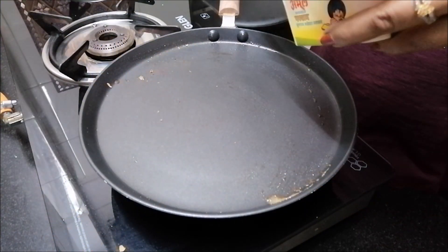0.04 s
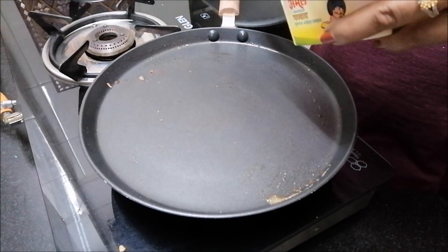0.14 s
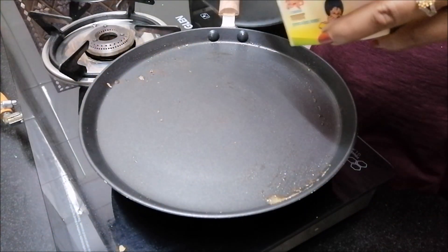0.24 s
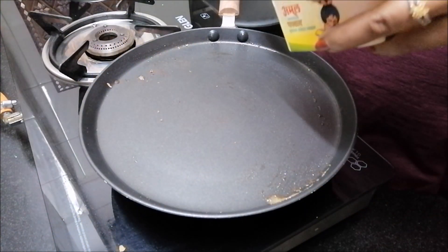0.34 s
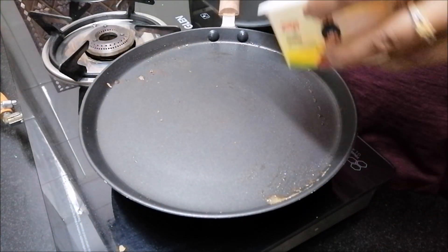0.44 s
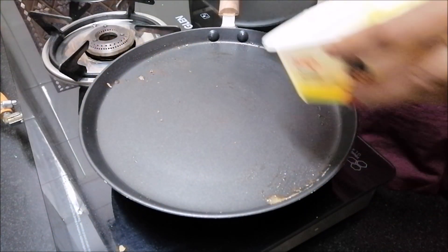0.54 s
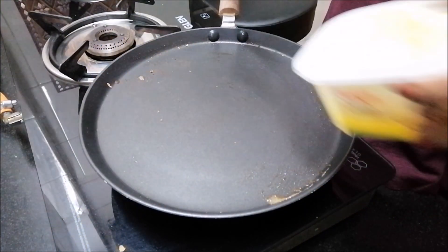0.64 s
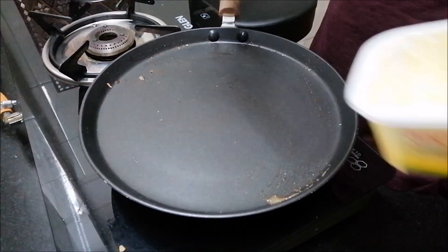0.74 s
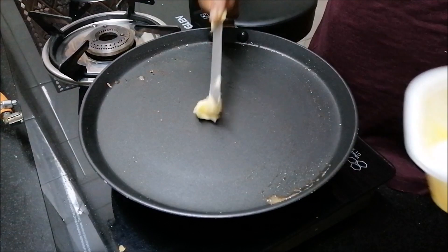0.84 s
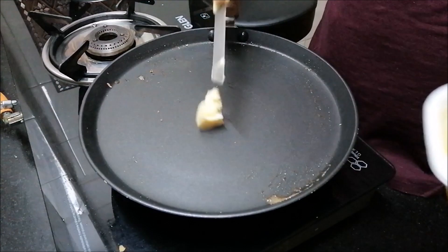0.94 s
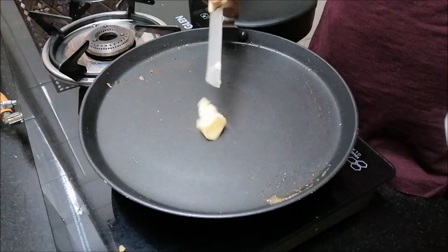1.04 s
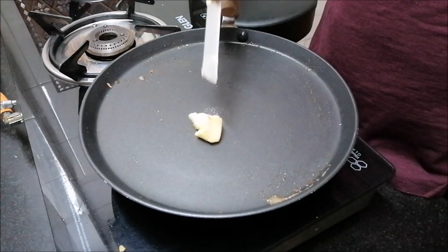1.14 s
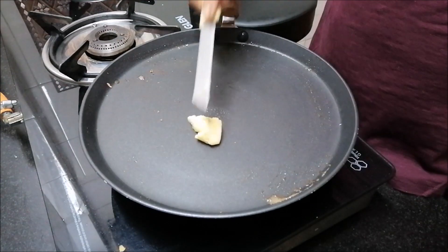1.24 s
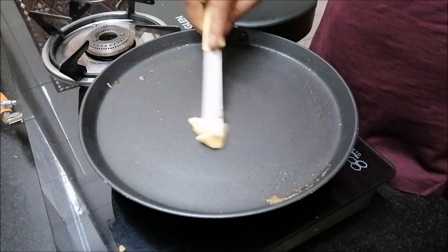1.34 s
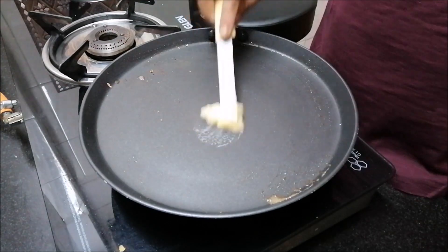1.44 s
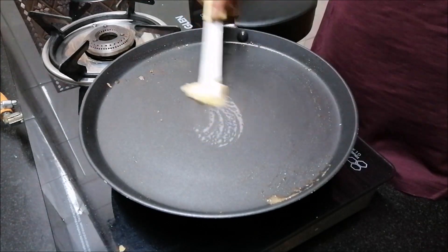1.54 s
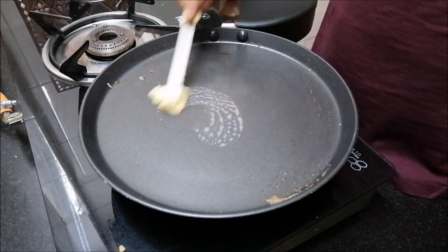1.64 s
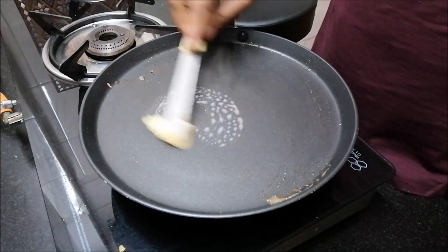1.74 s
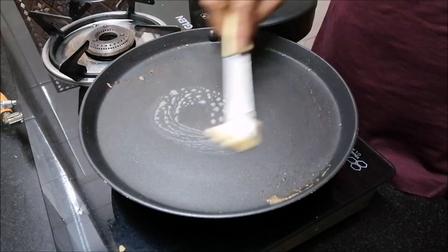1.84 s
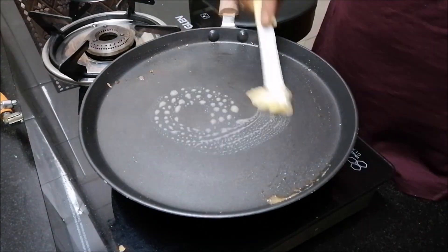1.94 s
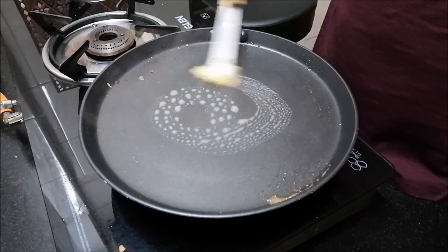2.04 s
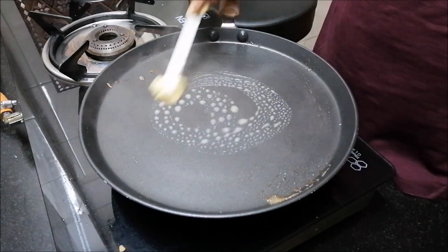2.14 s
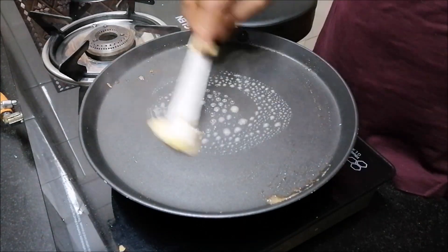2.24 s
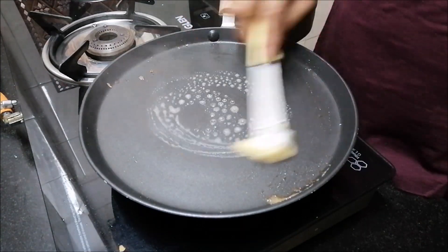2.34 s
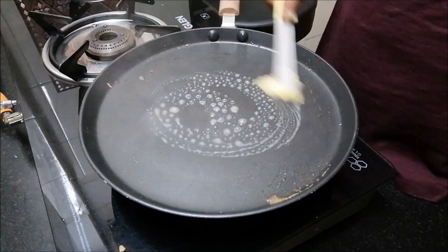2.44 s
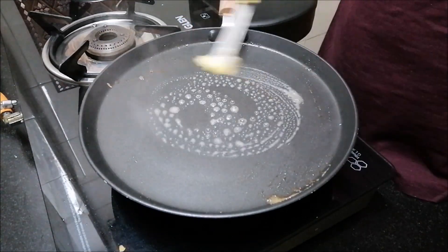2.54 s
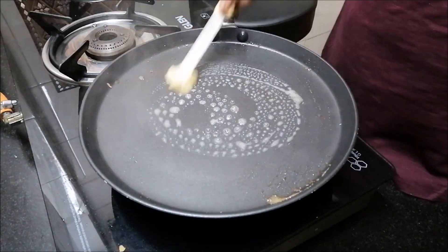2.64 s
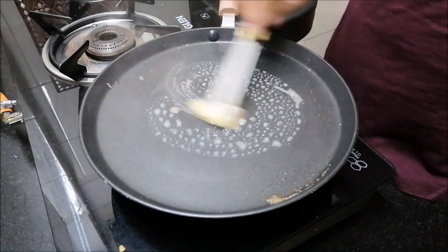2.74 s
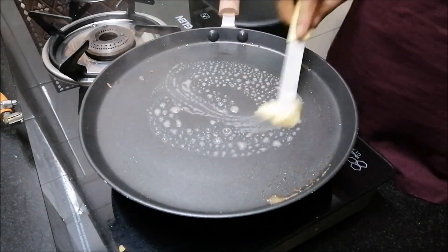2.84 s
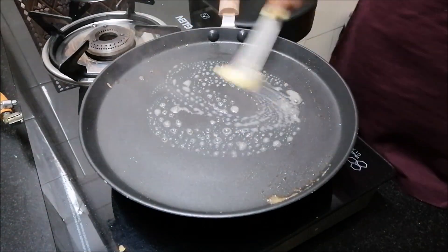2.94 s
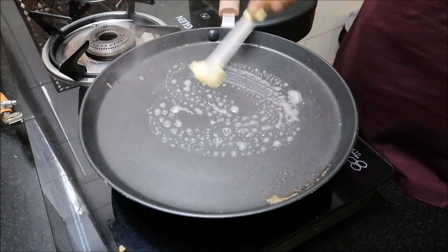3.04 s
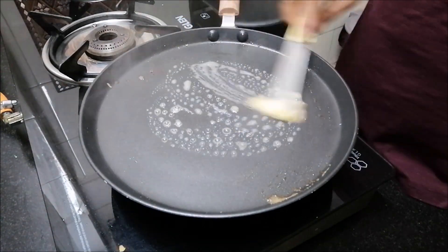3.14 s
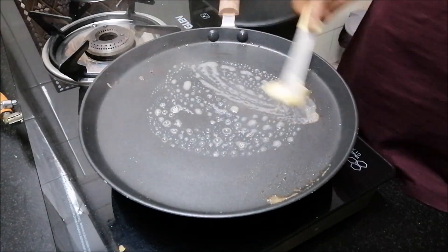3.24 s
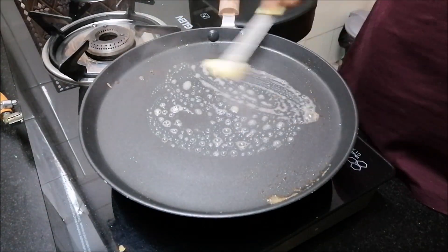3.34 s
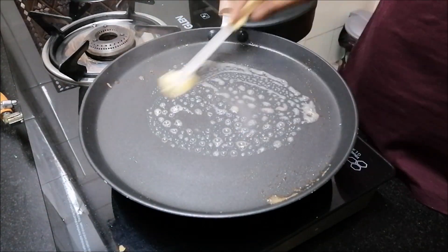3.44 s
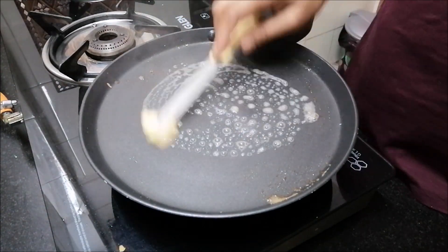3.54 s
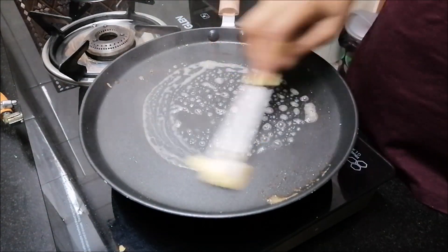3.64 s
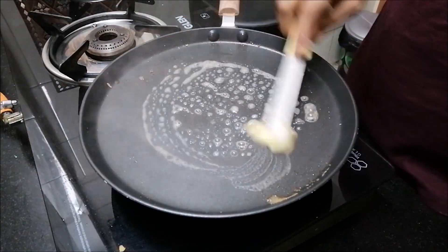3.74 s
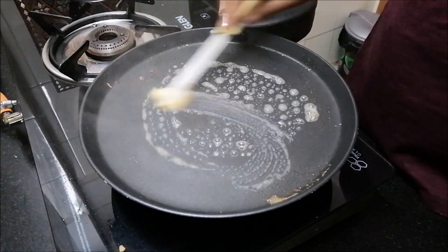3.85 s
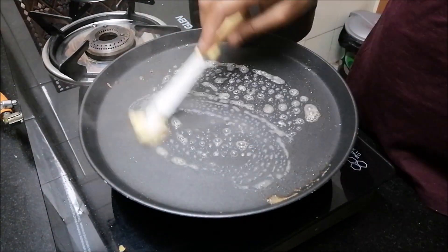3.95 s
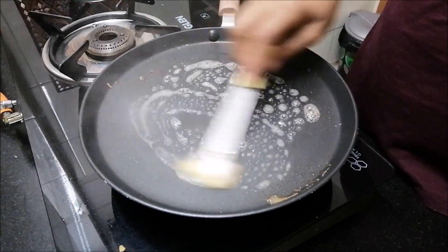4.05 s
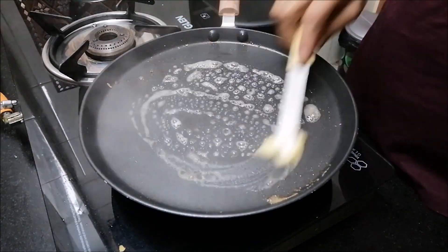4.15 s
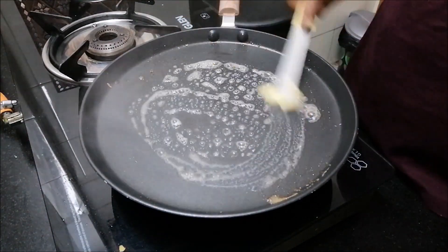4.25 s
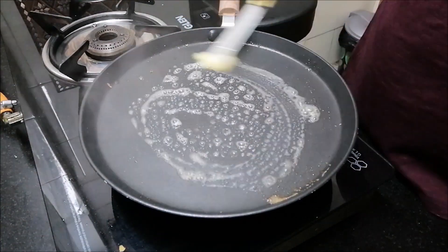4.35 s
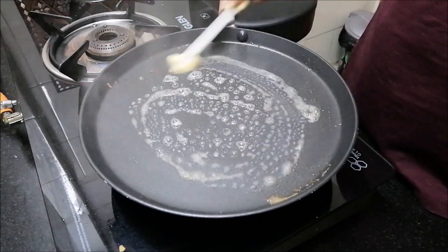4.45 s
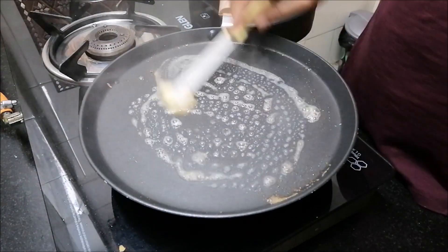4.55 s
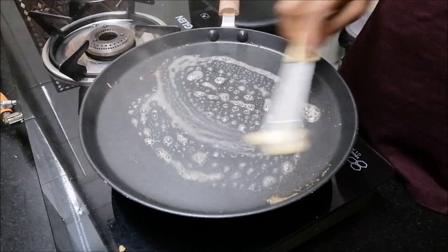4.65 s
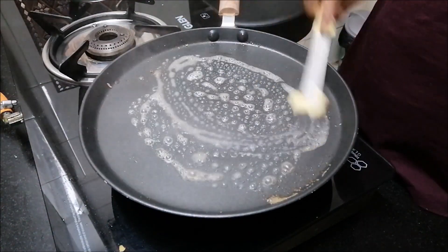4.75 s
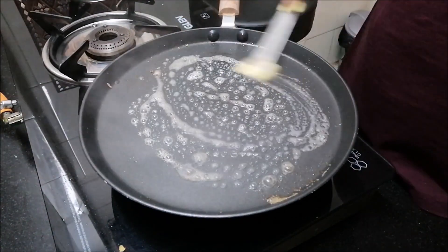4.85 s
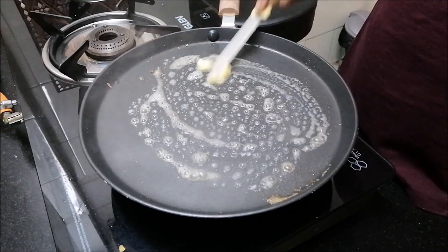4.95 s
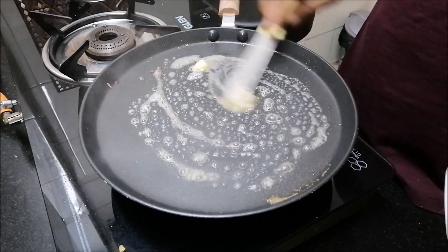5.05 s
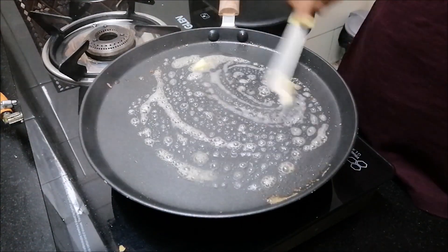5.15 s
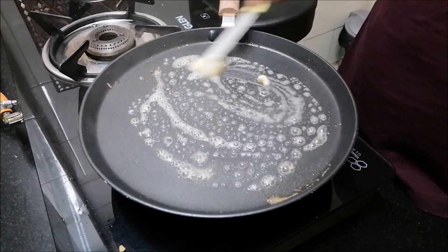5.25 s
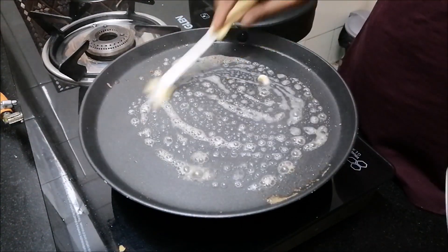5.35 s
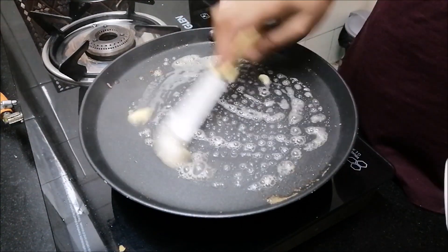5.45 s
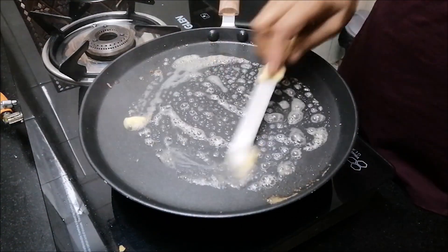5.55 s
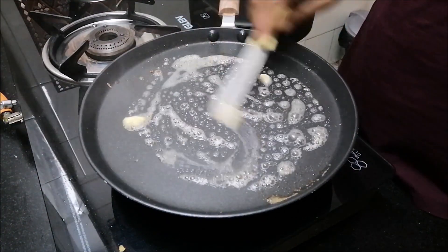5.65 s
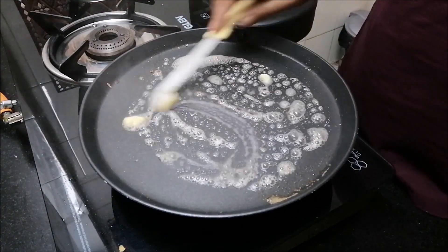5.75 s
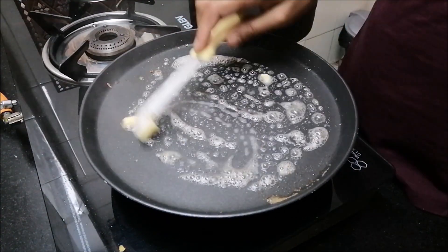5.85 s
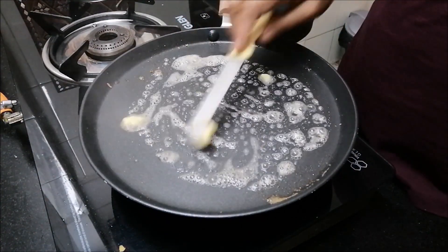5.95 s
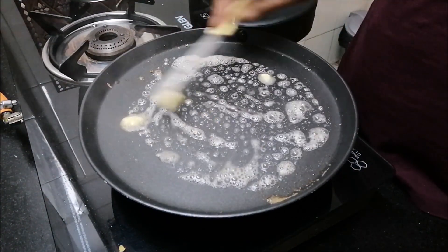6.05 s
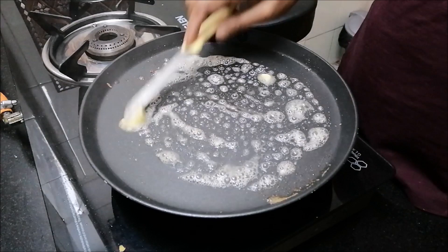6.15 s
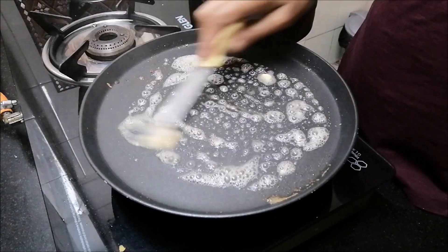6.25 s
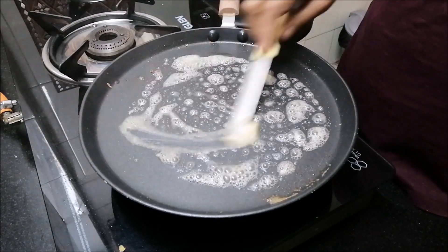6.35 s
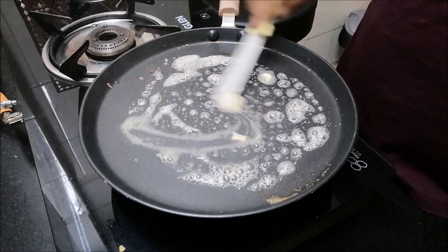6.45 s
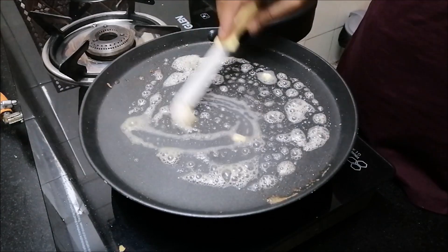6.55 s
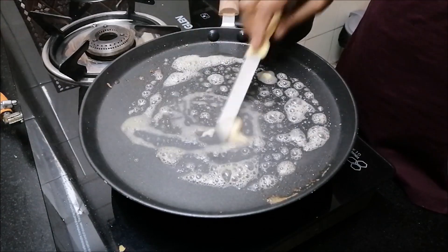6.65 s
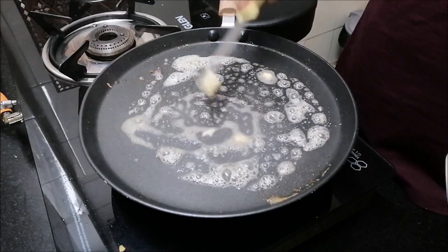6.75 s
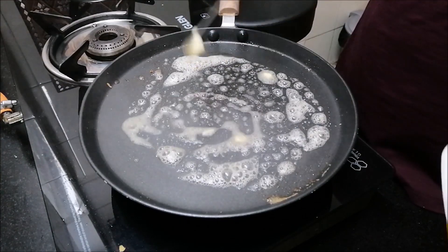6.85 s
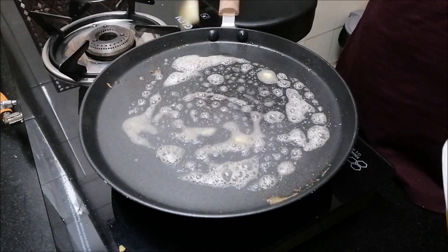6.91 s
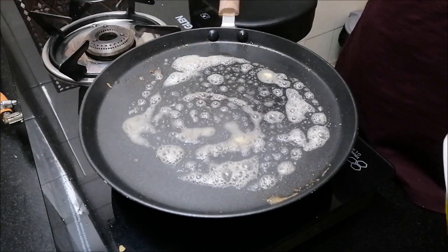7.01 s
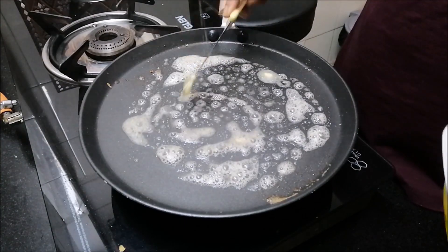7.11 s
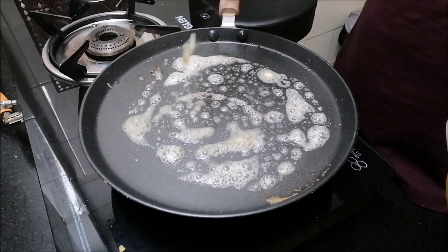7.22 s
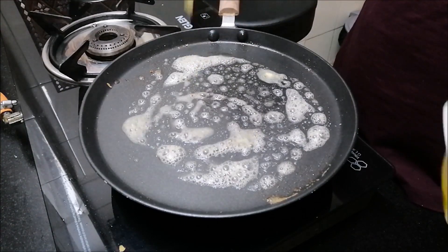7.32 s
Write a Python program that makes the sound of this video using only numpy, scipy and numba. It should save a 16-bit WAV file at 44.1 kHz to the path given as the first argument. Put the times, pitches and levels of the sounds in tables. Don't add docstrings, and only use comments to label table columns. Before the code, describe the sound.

Close phone microphone over a stove: quiet room air and motor hum with small taps for about a second, then an abrupt crackling hiss as butter meets hot metal. It thins while resting, grows as it is swept about, flaring gently with each stroke. Random snapping pops continue, one short metallic squeak comes late, and the foam grows coarser and bubblier.

```python
import sys
import numpy as np
from scipy import signal
from scipy.fft import rfft, irfft
from scipy.io import wavfile
from scipy.ndimage import uniform_filter1d
from numba import njit

SR = 44100
rng = np.random.default_rng(int(sys.argv[2]) if len(sys.argv) > 2 else 0)


def voltage_ratio(decibels):
    exponent = np.asarray(decibels, float) / 20
    return 10 ** exponent


def log_audio(samples):
    frames = np.atleast_2d(samples).T
    limited = np.clip(frames, -1, 1)
    pcm = np.round(limited * 32767).astype(np.int16)
    wavfile.write(sys.argv[1], SR, pcm)


N = 325458

LEFT_LATE_SAMPLES = 3
ALIVE = 0.65


def at(table, x, log=False):
    first, *columns = np.transpose(table)
    warp = np.log if log else np.asarray
    return np.array([np.interp(warp(x), warp(first), c) for c in columns])


def unit(x):
    return x / np.sqrt(np.mean(np.atleast_2d(x).mean(axis=0) ** 2))


def walk(rate_hz):
    hold = int(SR / rate_hz)
    x = np.repeat(rng.standard_normal(N // hold + 1), hold)
    x = uniform_filter1d(uniform_filter1d(x, hold), hold)[:N]
    return x / x.std()


def swell(t, start_s, length_s):
    return np.sin(np.pi * np.clip((t - start_s) / length_s, 0, 1)) ** 2


def ring(x, hz, t60_s):
    pole = np.exp(2j * np.pi * hz / SR - np.log(1000) / (t60_s * SR))
    return signal.lfilter([1], [1, -pole], x).imag


def causal(db):
    c = irfft(db * np.log(10) / 20)
    half = c.shape[-1] // 2
    c[..., 1:half] *= 2
    c[..., half + 1:] = 0
    return irfft(np.exp(rfft(c)))[..., :half]


def kitchen():
    # f/Hz, left level/dB, right level/dB
    air_levels = [(25, -6, -6), (70, -15.5, -4), (155, -1, 1), (400, -11, -16.5), (600, -8.5, -10.5),
                  (750, -13.5, -11.5), (1400, -28, -19.5), (2030, -26.5, -26), (3870, -29.5, -32.5),
                  (6500, -13, -23.5), (8400, -25.5, -20), (12300, -32.5, -33), (14800, -18, -30),
                  (15700, -43, -42.5)]
    # f/Hz, likeness/0-1
    likeness = [(25, 0.7), (130, 0.99), (290, 0.53), (640, 0.04), (1400, 0.03), (3000, 0)]
    # f/Hz, width/Hz, level/dB
    hum_tones = [(118.4, 19, -65.5), (190, 15, -70.5), (226, 26, -71.5), (373.8, 12, -68), (435.3, 28, -72),
                 (495, 8.2, -76.5), (650, 7.3, -76.5), (850.4, 7.7, -78), (1072, 31, -75), (2300, 110, -75),
                 (2890, 560, -74.5), (8150, 70, -87.5), (9400, 60, -87)]
    hz = np.maximum(np.arange(N // 2 + 1) * SR / N, 1)
    alike = np.clip(at(likeness, hz, log=True)[0], 0, 1)
    mid, side = rfft(rng.standard_normal((2, N)))
    pair = np.sqrt(1 + alike) * mid + np.sqrt(1 - alike) * side * np.array([[1], [-1]])
    air = unit(irfft(pair * voltage_ratio(at(air_levels, hz, log=True)), N)) * voltage_ratio(-58.5 + 0.26 * walk(11))

    fan_hz = 119.5 + 1.43 * walk(3.4)
    fan = voltage_ratio(-55.5 + 0.32 * walk(5.75)) * np.sin(2 * np.pi * np.cumsum(fan_hz) / SR)
    whine_hz = 2283 + 5.9 * walk(30)
    tones = voltage_ratio(-73.5 + 1.1 * walk(36)) * np.sin(2 * np.pi * np.cumsum(whine_hz) / SR)
    for f, width_hz, db in hum_tones:
        push = rng.standard_normal(N) + f / 900 * rng.standard_normal((2, N))
        tones = tones + voltage_ratio(db) * unit(ring(push, f, np.log(1000) / (np.pi * width_hz)))
    return air + (fan + tones) * voltage_ratio(np.array([[1.5], [-1.5]]))


def knocks(t):
    # t/s, peak level/dB, f/Hz, t60/s, left minus right/dB
    taps = [(0.044, -49.5, 6500, 0.011, 18), (0.048, -46, 14200, .008, 7), (0.083, -45.5, 214, 0.086, 11.5),
            (0.084, -58, 1530, 0.11, 12), (.095, -50, 537, 0.12, 8), (.143, -49, 322, 0.13, 11),
            (.211, -55, 500, 0.037, 7), (.378, -61, 1520, 0.033, 15.5), (.496, -51, 13000, .012, 5),
            (.504, -50, 10000, .012, 5), (.514, -54, 13500, .01, 5), (.13, -56, 1900, 0.099, 8),
            (.6, -50, 228, 0.08, 11), (3.562, -58, 720, 0.06, 12), (3.563, -65, 400, 0.06, 5),
            (5.755, -57, 750, 0.055, 0)]
    out = np.zeros((2, N))
    u = t[:8192]
    for s, peak_db, hz, t60_s, pan_db in taps:
        i = int(s * SR)
        rattle = rng.standard_normal(len(u)) * voltage_ratio(-60 * u / t60_s) * np.minimum(u / 0.0026, 1)
        ring_cycles = 12 if hz < 5000 else 5
        tap = ring(rattle, hz, min(t60_s, ring_cycles / hz))
        level = voltage_ratio(peak_db + np.array([[pan_db], [-pan_db]]) / 2)
        out[:, i:i + len(u)] += level * tap / np.abs(tap).max()
    return out


@njit
def grains(start, hz, cycles, glide, size, lag, pan):
    out = np.zeros((2, N + 4096))
    for k in range(len(start)):
        p = np.exp((2j * np.pi - 1 / cycles[k]) * hz[k] / SR)
        turn = np.exp(2j * np.pi * glide[k] * (hz[k] / SR) ** 2 / cycles[k])
        z, i, j = size[k] + 0j, int(start[k]), int(start[k] + lag[k])
        for n in range(min(int(5 * cycles[k] * SR / hz[k]), 2000)):
            out[0, i + n] += z.imag * pan[k]
            out[1, j + n] += z.imag / pan[k]
            z *= p
            p *= turn
    return out[:, :N]


def ports(x):
    # f/Hz, left level/dB, right level/dB
    port_peaks = [(2000, -24, -24), (3050, -19, -22), (4100, -27, -26), (5100, -9, -13), (6400, -10, -13),
                  (7200, 0, -8), (7900, -6, -8), (8400, -8, 2), (9300, -12, -6), (10000, -9, -5),
                  (10700, -13, -11), (14000, -8, -12), (14850, -1, -7), (15450, -10, -16)]
    hz = np.maximum(np.arange(513) * SR / 1024, 1)
    low_hz = port_peaks[0][0]
    low_cut_db = np.clip((hz - low_hz) / 30, -7, 0) + 22 * np.log10(np.minimum(hz / low_hz, 1))
    response = causal(at(port_peaks, hz, log=True) + low_cut_db)
    return signal.fftconvolve(x, response, axes=1)[:, :N]


def foam(alive):
    count, lag_samples = 60000, 25
    when, keep, pitch, ringing, big, place, side, rise = rng.random((count, 8)).T
    start = 64 + when * (N - 64)
    share = np.clip(alive[start.astype(int)], .02, 1)
    hz = 900 + 16500 * pitch
    turns = 1.25 + 6.45 * ringing ** 2
    size = voltage_ratio(-2.45 * np.log(1 - .997 * big)) * np.sqrt(hz / turns / share) * (keep < share)
    lag = lag_samples * (2 * place - 1) - LEFT_LATE_SAMPLES
    bubbles = grains(start, hz, turns, 0.219 * rise, size, lag, voltage_ratio(11.5 * (side - .5)))
    seethe = rng.standard_normal((2, N))
    spurts = voltage_ratio(0.77 * walk(60) + 0.79 * walk(250) + (1 - alive) * 0.47 * walk(30))
    seethe_gain = voltage_ratio(3 + 4.6 * (alive - ALIVE))
    return (unit(bubbles * spurts) + seethe_gain * unit(seethe * spurts ** 0.25)) * voltage_ratio(0.71 * walk(20))


def sizzle(t):
    # t/s, fizz level/dB
    landing = [(.906, -69), (.914, -51), (.932, -41.5), (.975, -44.5), (1.024, -49.5), (1.06, -46),
               (1.28, -48), (1.32, -48.5), (1.43, -46)]
    # t/s, fizz level/dB, bubble size/dB, left minus right/dB
    boil = [(1.47, -45, 2, 1), (1.65, -39.5, -3.5, -2.5), (1.9, -37.5, -2, -2), (2.25, -39, -3, -1),
            (2.55, -41, -1.5, -1.5), (3, -39, -3, -1), (3.4, -39.5, -1, -1.5), (3.8, -38, -2.5, -2),
            (4.0, -39, -1, 1), (4.35, -39.5, -1, 1), (4.7, -38, -2.5, -1), (5.0, -39.5, 0.5, 0),
            (5.4, -39, -1, 1.5), (5.85, -39, 1, 3), (6.28, -41, 7, 1.5), (6.52, -37, -1, 3.5),
            (7.05, -40, 6, 4.5), (7.38, -37.5, 6.5, 3.5)]
    # t/s, length/s, fizz flare/dB, deep bubble flare/dB
    sweeps = [(1.714, 0.31, -0.5, 2.5), (2.147, 0.16, 1.5, 2), (2.226, 0.33, 0.5, 2.5),
              (2.745, 0.27, -0.5, 2.5), (2.808, .035, 2, 0), (3.147, 0.17, 2, 0.5), (3.4, 0.11, 0.5, 2),
              (3.49, 0.17, 1.5, 3), (3.577, 0.15, 2, 3.5), (3.694, 0.096, 2.5, 1), (3.944, 0.27, 1, 2.5),
              (4.453, 0.46, 0, 1), (5.035, 0.29, 2.5, 1), (5.45, 0.24, 1.5, 2), (5.691, 0.21, 1, 1.5),
              (6.394, 0.24, -1, 0.5), (7.203, 0.23, -2, -1)]
    still_s, spread_s, flash_s = landing[-1][0], boil[1][0], landing[2][0]
    moving = np.clip((t - still_s) / (spread_s - still_s), 0, 1)
    still = 1 - moving
    flash = np.exp(-np.maximum(t - flash_s, 0) / .05)

    size_db, place_db = at(boil, t)[1:]
    flare_db = sum(row[2] * swell(t, *row[:2]) for row in sweeps)
    deep_flare_db = sum(row[3] * swell(t, *row[:2]) for row in sweeps)
    fizz_db = at(landing + [row[:2] for row in boil], t)[0] + flare_db
    deep_change_db = deep_flare_db - flare_db - 2 * still
    deep_db = -21 - 0.3 * size_db + deep_change_db
    middle_db = 0.37 * size_db + deep_change_db - 0.5 * still
    fine_db = -1 - 0.58 * size_db * moving + still + 4.5 * flash
    pan_db = place_db * moving - 2 * still + 3.5 * flash

    still_alive = 0.36
    heard = rfft(ports(foam(still_alive + (ALIVE - still_alive) * moving)))
    hz = np.linspace(0, SR / 2, heard.shape[1])
    above = [np.clip((hz - edge_hz) / 800 + .5, 0, 1) for edge_hz in (3750, 6600, 10300)]
    deep = unit(irfft(heard * (1 - above[0]), N))
    middle = irfft(heard * (above[0] - above[1]), N)
    fizz = irfft(heard * (above[1] - above[2]), N)
    fine = unit(irfft(heard * above[2], N))
    deep = unit(deep + .07 * deep[::-1])
    lean = voltage_ratio(np.array([pan_db, -pan_db]) / 2)
    body = unit(voltage_ratio(middle_db) * middle + fizz) + voltage_ratio(fine_db) * fine
    return (t > landing[0][0]) * voltage_ratio(fizz_db) * (voltage_ratio(deep_db) * deep + lean * body)


def pops():
    # t/s, peak
    # level/dB, f/Hz, left minus right/dB
    lone_drop = (-1, -46, 8500, 3)
    # t/s, peak level/dB, f/Hz, left minus right/dB
    pat_drops = [(0.9315, -28, 7100, 2), (0.9342, -29, 7300, 6), (0.9398, -26, 14800, 8),
                 (0.9426, -27, 15200, 5), (0.95, -19.5, 8400, 0), (0.9553, -28, 8700, 1),
                 (1.0102, -31, 8500, -4), (1.0275, -33, 8600, -2), (1.054, -32, 9800, -1),
                 (1.0585, -31, 8400, -3), (1.0654, -30, 8800, 0), (1.0678, -28, 8400, -1),
                 (1.0723, -31, 8400, -4), (1.0877, -29, 8400, -5), (1.1197, -22, 8400, -4),
                 (1.1233, -24, 9200, -1), (1.148, -27, 8700, -7), (1.1521, -31, 8500, -3),
                 (1.1568, -30, 8400, -7), (1.1745, -29, 15100, 5), (1.1849, -27, 15000, 4),
                 (1.192, -32, 15000, 5), (1.2297, -28, 8400, -3), (1.2327, -27, 14800, 3),
                 (1.2359, -24, 8400, -1), (1.2415, -30, 8500, -4), (1.2658, -23, 14900, -2),
                 (1.2688, -32, 15000, 3), (1.2724, -31, 14900, 4), (1.2813, -28, 8500, 0),
                 (1.3107, -32, 8400, 2), (1.3533, -27, 8100, -2), (1.3778, -27, 8300, -6),
                 (1.3804, -25.5, 8500, -5), (1.3955, -29, 8500, 0), (1.3984, -32, 8500, -6),
                 (1.4287, -33, 8400, -9), (1.438, -31, 8400, -2), (1.4575, -31, 8400, 0),
                 (1.469, -30, 8300, -2), (1.4718, -31, 7400, 0), (1.476, -31, 8600, -2),
                 (1.517, -25.5, 8200, -8), (1.5301, -28, 8300, -2), (1.5654, -24, 8400, -6)]
    # t/s, peak level/dB, f/Hz, left minus right/dB
    foam_drops = [(1.7029, -24, 7400, 2), (1.7385, -24, 8400, -2), (1.7475, -20, 8400, -7),
                  (2.1908, -19, 8300, -7), (2.201, -19, 10000, -3), (2.3067, -23, 8700, 1),
                  (2.5377, -23, 8500, -3), (2.6607, -20, 7000, -2), (2.6812, -22, 14700, -4),
                  (2.6878, -19, 8600, -2), (2.8212, -26, 9800, -4), (2.8268, -24, 8700, -5),
                  (2.962, -26, 10000, -2), (3.0153, -24, 14800, -2), (3.2417, -25, 7300, -1),
                  (3.5492, -19, 7100, 1), (3.6291, -17, 8300, -5), (3.7563, -20, 8500, -8),
                  (3.827, -23, 8600, -3), (3.8773, -24, 8600, -2), (3.9297, -23, 8500, -2),
                  (4.0243, -24, 8400, 0), (4.0626, -25, 8300, -4), (4.2074, -25, 7300, 2),
                  (4.3375, -24, 8400, -3), (4.4208, -25, 8600, -3), (4.5089, -21, 8500, -9),
                  (4.6, -23, 9000, -2), (4.6272, -23, 8500, -3), (4.9232, -24, 8500, 1),
                  (4.973, -22, 8300, -5), (5.4178, -17, 6800, 9), (5.4956, -24, 8500, -2),
                  (5.6418, -22, 9100, -2), (5.7124, -24, 6900, 2), (5.7988, -25, 6900, 6),
                  (5.9292, -24, 8400, 2), (6.1651, -26, 8900, -1), (6.1832, -27, 8400, 2),
                  (6.2337, -27, 7800, 3), (6.2441, -27, 8500, -2), (6.5345, -23, 7300, 4),
                  (6.7052, -22, 7100, 3), (6.7161, -21, 7500, 3), (6.9802, -23, 7400, 10),
                  (7.0179, -29, 6800, 3), (7.0369, -26, 8400, 1), (7.0608, -24, 5600, 10),
                  (7.24, -24, 7200, 9), (7.2852, -26, 6900, 3)]
    s, peak_db, hz, pan_db = np.transpose([lone_drop] + pat_drops + foam_drops)
    peak_db = peak_db - 1.5 * (s > pat_drops[-1][0])
    place, ringing = rng.random((len(s), 2)).T
    start = (s - .0003) * SR
    lag = 6 * (place - .5) - LEFT_LATE_SAMPLES
    flat, lean = np.zeros(len(s)), voltage_ratio(pan_db / 2)
    crack = grains(start, 13000 + flat, .5 + flat, flat, voltage_ratio(peak_db + 18.5), lag, lean ** .5)
    bell = grains(start, hz, 2.5 + 3.5 * ringing, flat + 0.043, voltage_ratio(peak_db + 1.5), lag, lean)
    puff_decay = voltage_ratio(-60 * np.arange(2048) / SR / .018)
    puff = signal.fftconvolve(np.abs(crack), puff_decay[None], axes=1)[:, :N]
    splutter = rng.standard_normal((2, N)) * voltage_ratio(2.5 * walk(500))
    thin = signal.butter(3, 4900, "high", fs=SR, output="sos")
    return signal.sosfilt(thin, ports(crack + voltage_ratio(-21.5) * puff * splutter) + bell)


def spatula(t):
    # f/Hz, level/dB, t60/s
    pan_modes = [(1110, -20, .03), (1610, -17, .04), (2150, -12, .04), (2370, -12, .05), (2650, -13, .04),
                 (3105, 0, .055), (4760, -14, .04), (5150, 0, .055), (5460, -13, .04)]
    # t/s, length/s, level/dB, extra squeak of top modes/dB
    scrapes = [(3.42, 0.065, -56.5, -10), (3.5, .07, -58, -10), (3.62, .06, -59, -10), (4.0, .06, -58, -10),
               (4.56, 0.043, -56.5, -10), (5.1, .05, -60, -3), (5.278, 0.083, -49, 15),
               (5.43, .05, -57, -10), (5.51, .05, -54, -10), (5.66, .07, -56, -10), (6.338, .04, -57, -10),
               (6.46, .06, -61, -5)]
    slide = voltage_ratio(-72 + 4 * walk(15)) * np.clip(t - 1.4, 0, 1)
    rub = slide + sum(voltage_ratio(db) * swell(t, s, d) ** 0.4 for s, d, db, _ in scrapes)
    squeak = slide + sum(voltage_ratio(db + top_db) * swell(t, s + d / 8, d) ** 1.1 for s, d, db, top_db in scrapes)
    modes = np.zeros(N)
    for hz, db, t60_s in pan_modes:
        drive = squeak if hz > 4000 else rub
        chatter = voltage_ratio(db + 2.8 * walk(400))
        mode_hz = hz + 1.8 / t60_s * walk(200)
        modes += chatter * drive * np.sin(2 * np.pi * np.cumsum(mode_hz) / SR)
    band = signal.butter(2, [1400, 5000], "band", fs=SR, output="sos")
    rasp = unit(signal.sosfilt(band, rng.standard_normal(N)))
    edge = modes + voltage_ratio(-13) * rub * rasp
    return np.array([np.roll(edge, LEFT_LATE_SAMPLES), edge]) * voltage_ratio(np.array([[3.5], [-5.5]]))


def moans(t):
    # t/s, length/s, f/Hz, level/dB
    far_hums = [(3.95, 0.1, 741, -76), (4.256, 0.46, 750, -72.5), (4.68, 0.054, 750, -72),
                (4.8, 0.17, 190, -67.5), (5.718, 0.12, 650, -68.5)]
    air = rng.standard_normal(N) + 0.62 * rng.standard_normal((2, N))
    hums = sum(voltage_ratio(db) * swell(t, s, d) ** .5 * unit(ring(air, hz, 0.12)) for s, d, hz, db in far_hums)
    return hums * voltage_ratio(np.array([[2.5], [-2.5]]))


def scene():
    # t/s, level/dB
    phone_gain = [(0, 1.5), (.15, 2), (.25, 0), (.93, 0.5), (.96, -8), (1.5, -8), (2.1, -8.5), (5.9, -9.5),
                  (6.2, -8), (6.7, -10.5), (7.38, -8)]
    t = np.arange(N) / SR
    room = kitchen() * voltage_ratio(at(phone_gain, t))
    return room + knocks(t) + sizzle(t) + pops() + spatula(t) + moans(t)


def low_pass(x):
    return signal.sosfilt(signal.butter(12, 15780, fs=SR, output="sos"), x)


def record(dry):
    top_cut = signal.ellip(10, .2, 80, 15750, fs=SR, output="sos")
    mix = signal.sosfilt(top_cut, dry)
    return low_pass(mix)


dry = scene()
out = record(dry)
log_audio(out)
```